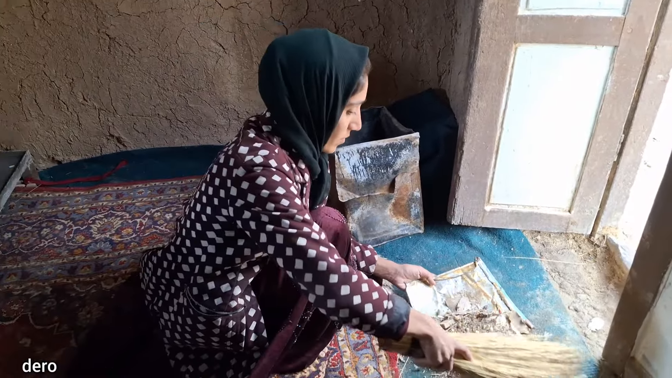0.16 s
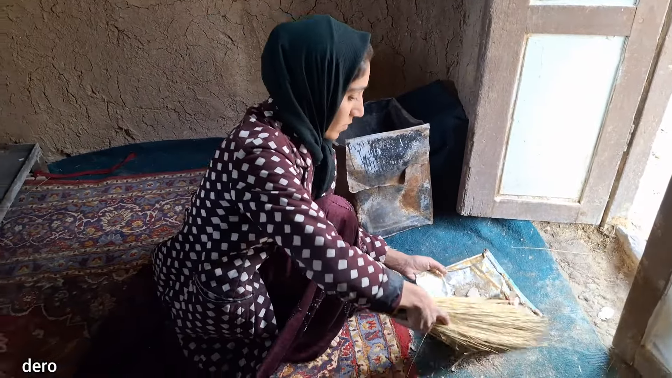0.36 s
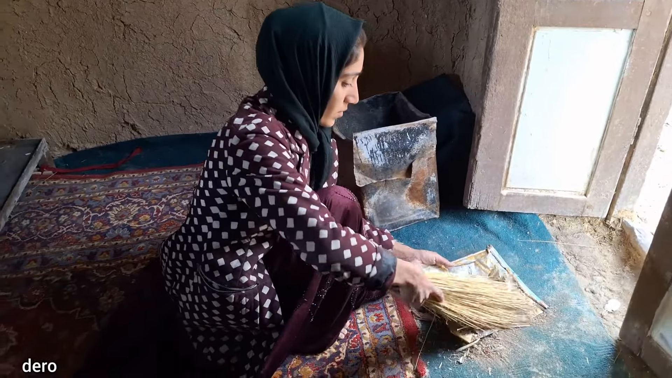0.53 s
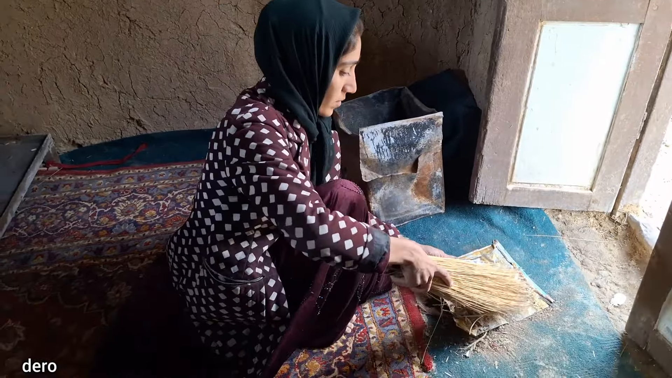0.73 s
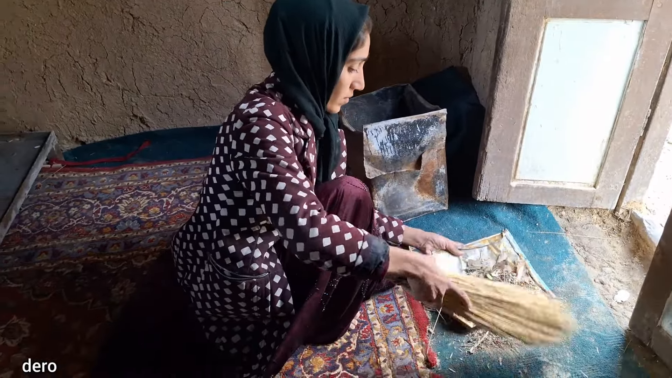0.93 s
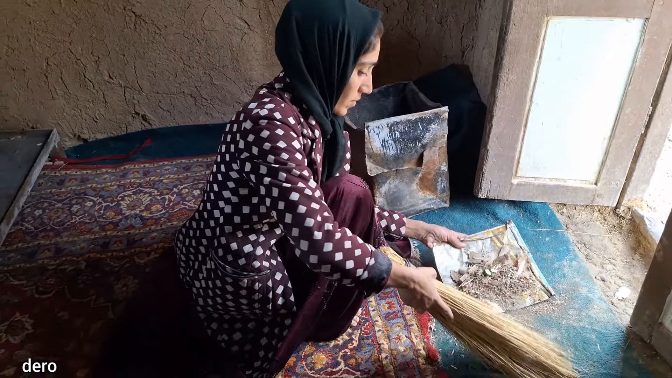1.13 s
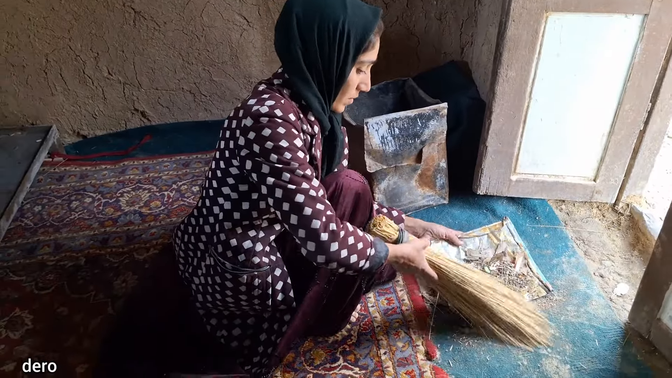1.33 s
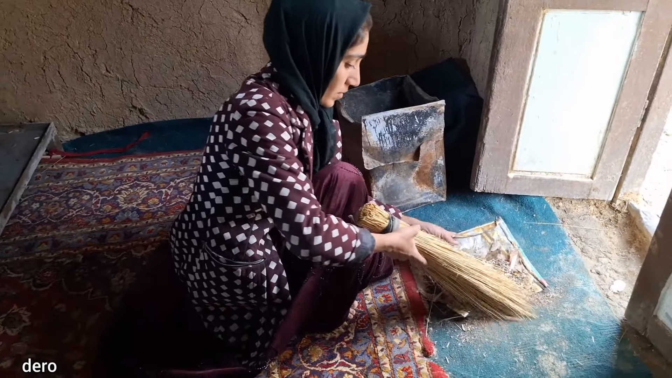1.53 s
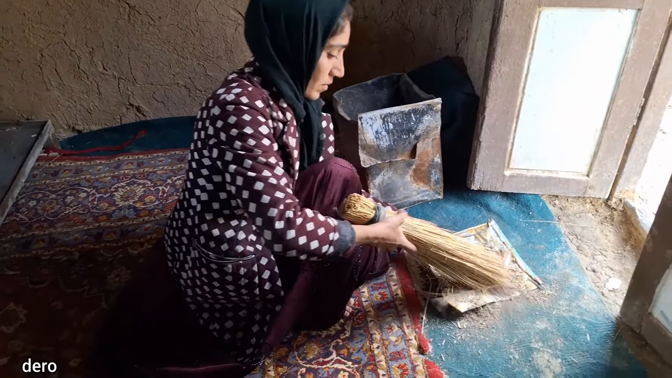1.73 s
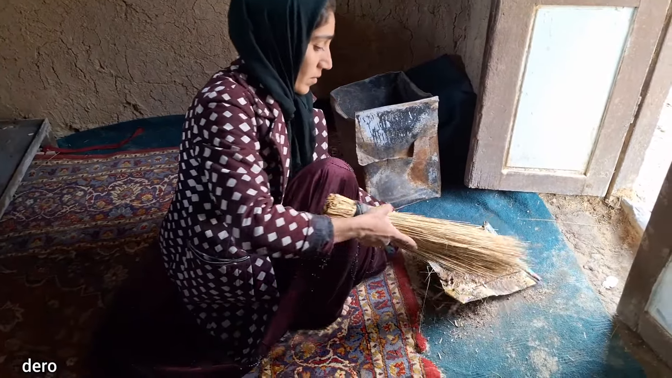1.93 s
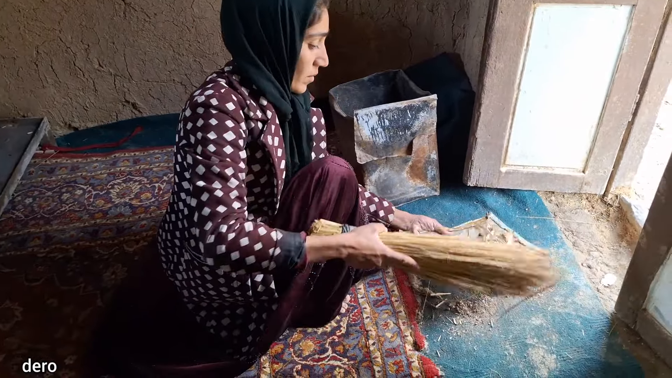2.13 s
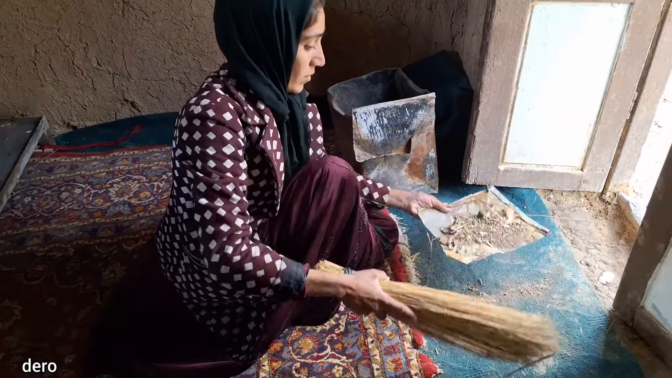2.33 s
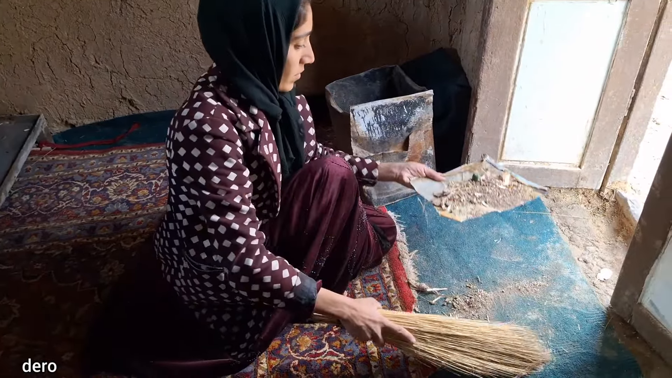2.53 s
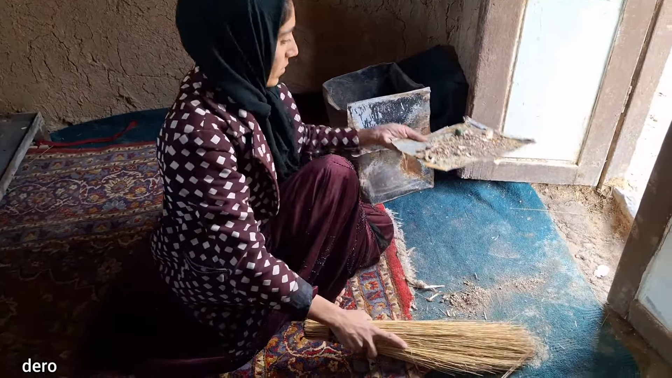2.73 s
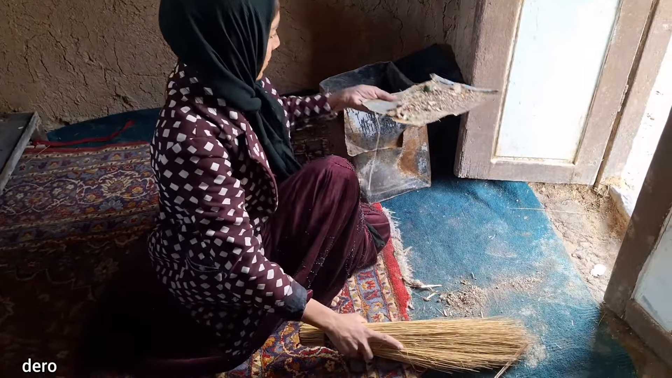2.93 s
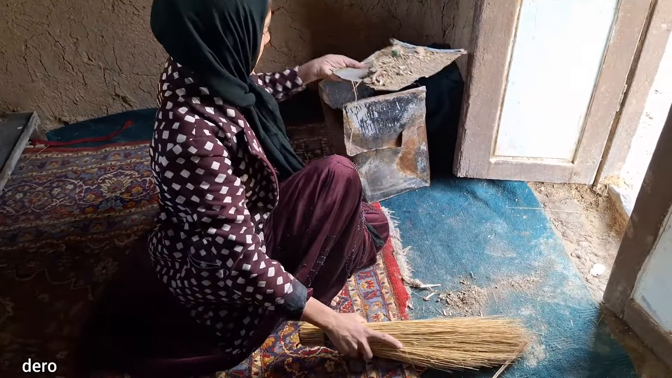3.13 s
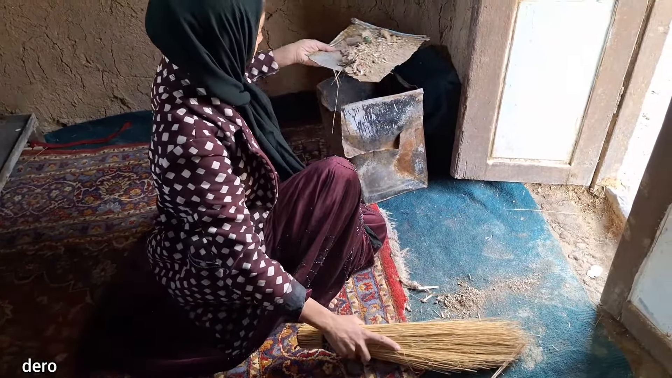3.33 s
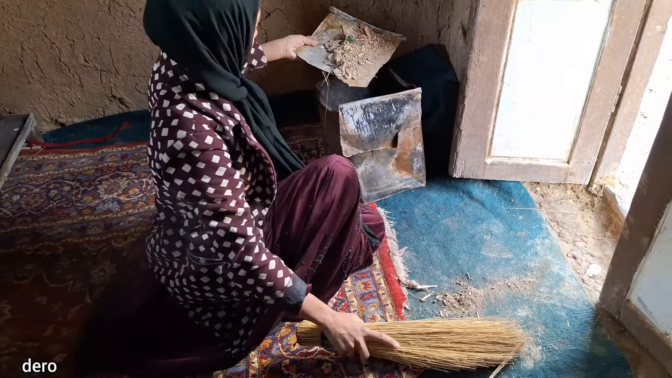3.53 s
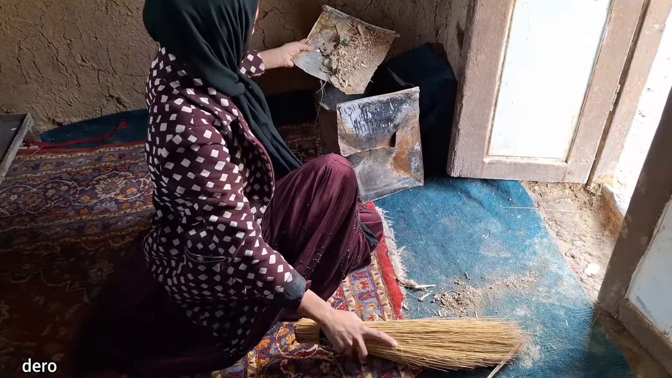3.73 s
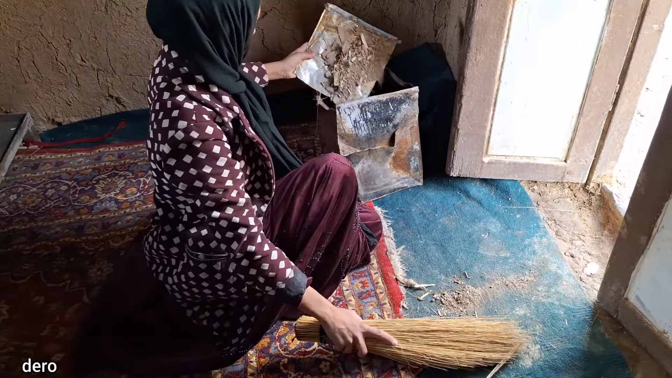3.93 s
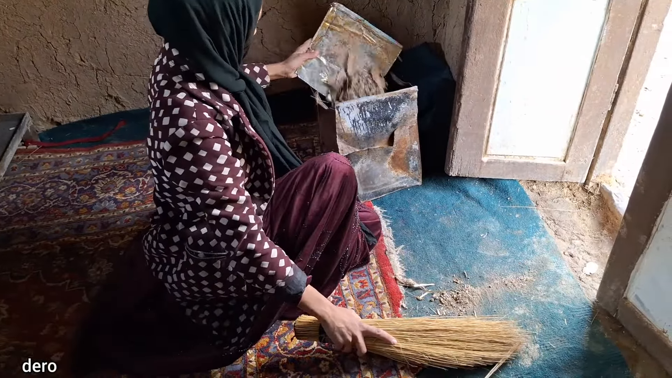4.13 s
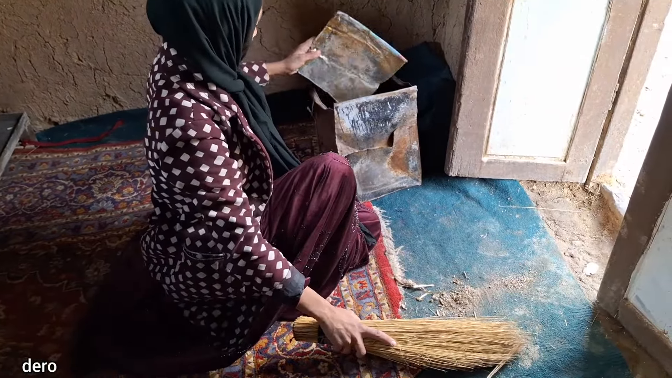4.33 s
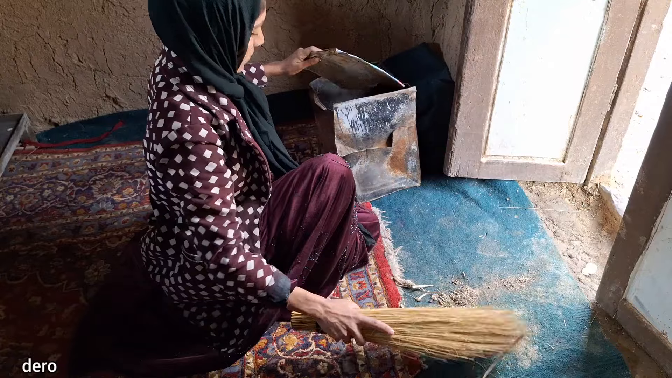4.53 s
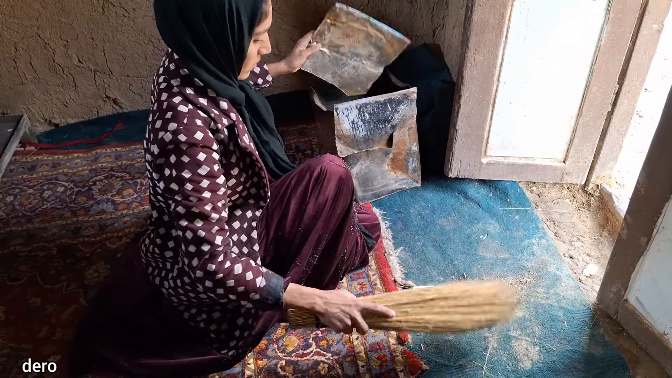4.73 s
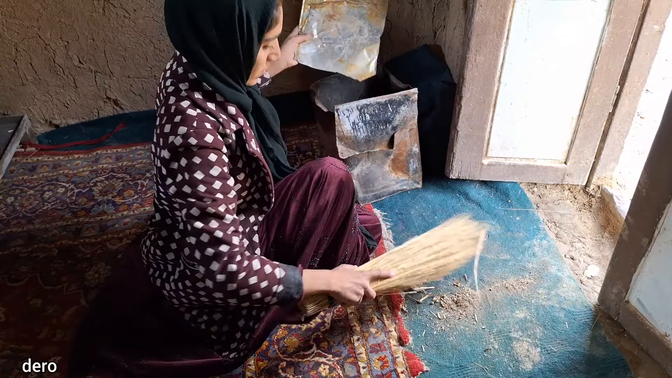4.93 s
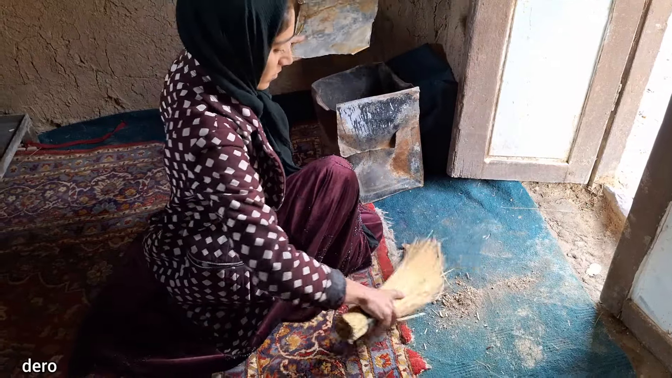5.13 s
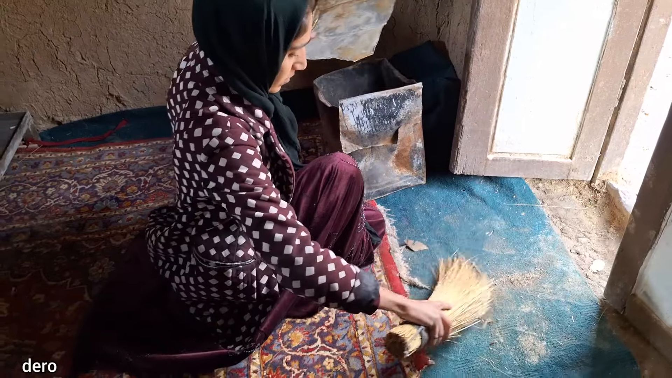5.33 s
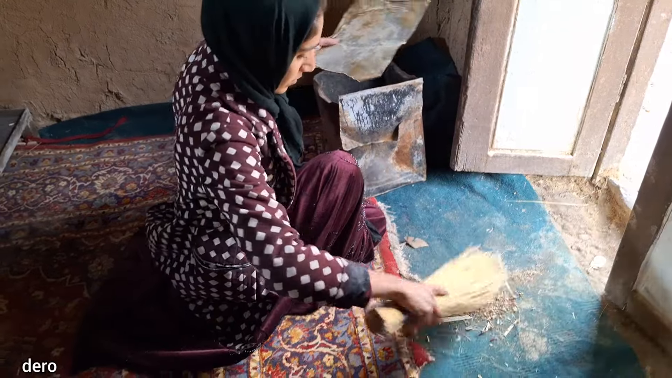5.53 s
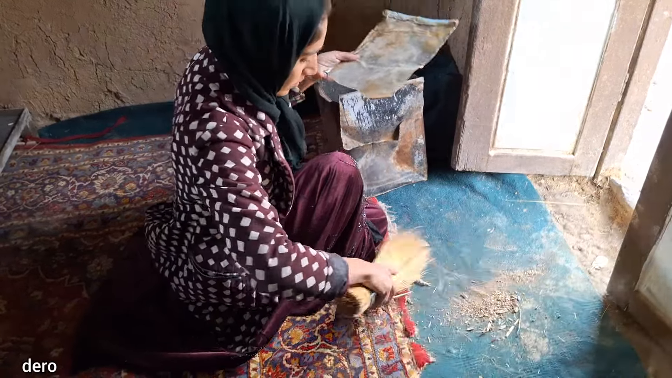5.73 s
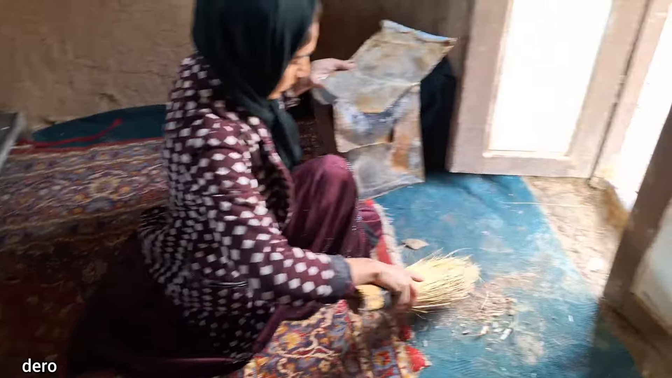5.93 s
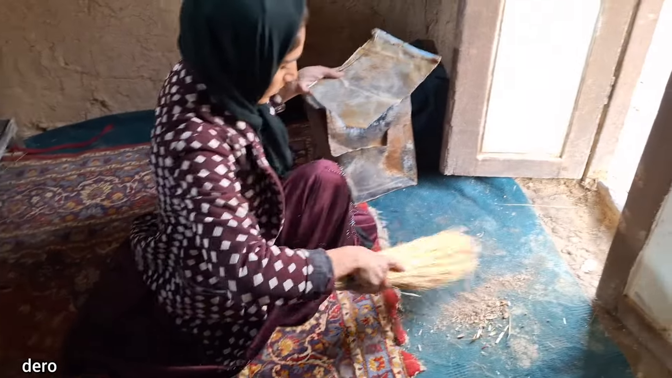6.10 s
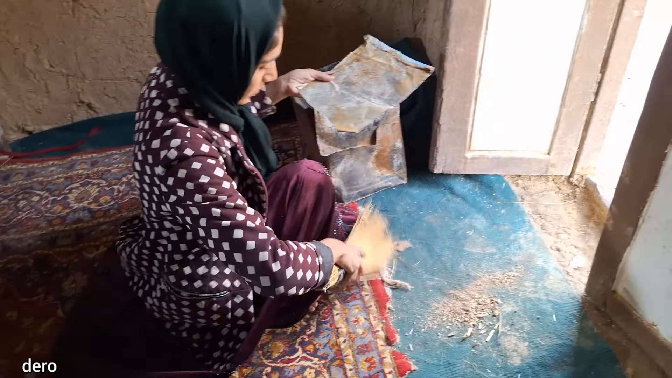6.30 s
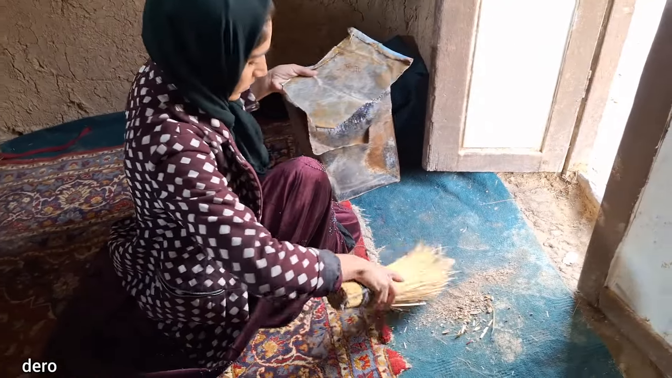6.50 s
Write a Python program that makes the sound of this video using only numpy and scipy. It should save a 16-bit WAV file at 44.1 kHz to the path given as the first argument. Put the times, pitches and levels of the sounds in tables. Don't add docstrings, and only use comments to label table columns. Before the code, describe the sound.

Close in a small room, a short straw broom makes quick dry rasps on a rug, pushing grit that rattles and ticks on a thin metal pan. A quiet gap follows, then dirt slides off and a lump bangs a tin bin, its walls ringing briefly. Three light brush strokes end it, over faint distant rumble and microphone hiss, the broom slightly to the right.

```python
import sys
import numpy as np
from scipy import signal
from scipy.fft import rfft, irfft, next_fast_len
from scipy.io import wavfile

SR = 44100
rng = np.random.default_rng(int(sys.argv[2]) if len(sys.argv) > 2 else 0)


def pcm_store(signal):
    levels = np.round(np.clip(np.atleast_2d(signal), -1, 1) * 32767)
    wavfile.write(sys.argv[1], SR, levels.astype(np.int16).T)


def convert_level_to_amplitude(level_db):
    exponent = np.asarray(level_db, float) / 20
    return 10 ** exponent


N = 293706
SIZE = next_fast_len(N + SR)

# pitch in Hz, level in dB, time to die by 60 dB in s.
PAN_MODES = [(713, -2, 0.1), (758.6, -0.5, 0.087), (797, -13.5, 0.017), (1160, -12.5, 0.2), (1277, -6, .04),
             (2030, -2.5, 0.03), (2940, -1.5, .02), (3963, 1.5, 0.027)]
# frequency in Hz, level in dB per Hz.
GRIT_TOP = [(4590, -26.5), (7800, -0.5), (8730, -14.5), (9840, 1), (11300, -6), (14500, -3.5), (15600, -6)]


def rms_one(x):
    return x / np.sqrt(np.mean(x ** 2) + 1e-20)


def at_bins(points):
    hz, value = np.transpose(points)
    return np.interp(np.log(np.fft.rfftfreq(SIZE, 1 / SR) + 1), np.log(hz), value)


def colour(x, spectrum):
    shaped = rfft(x, SIZE) * convert_level_to_amplitude(at_bins(spectrum))
    return rms_one(irfft(shaped, SIZE)[..., :N])


def above(x, hz):
    return signal.sosfilt(signal.butter(3, hz, "high", fs=SR, output="sos"), x)


def drift(rate):
    r = np.exp(-80 * np.pi * rate / SR)
    slow = signal.lfilter([1], [1, -2 * r, r * r], rng.standard_normal(N // 40 + 2002))[2000:]
    return np.interp(np.arange(N) / 40, np.arange(len(slow)), rms_one(slow))


def ring(clicks, hz, t60):
    r, w = convert_level_to_amplitude(-60 / (t60 * SR)), 2 * np.pi * hz / SR
    return signal.lfilter([0, np.sin(w)], [1, -2 * r * np.cos(w), r * r], clicks + 1e-18)


def grains(per_s, spread_db, clump_db, jolt_db):
    sizes = convert_level_to_amplitude(spread_db * np.minimum(rng.exponential(1, (2, N)), 3.6))
    sizes = sizes * rng.choice([-1, 1], (2, N))
    born = rng.random((2, N)) < per_s / SR
    starts = (rng.random(N) < 25.0 / SR) * rng.random(N)
    jolts = signal.lfilter([1], [1, -np.exp(-70.0 / SR)], starts)
    return rms_one(sizes * born * convert_level_to_amplitude(clump_db * drift(30) + jolt_db * np.minimum(jolts, 1.5)))


def swells(peak_s, peak_db, rise_s, fall_s, shape):
    t = np.arange(0, N + 32, 32)[:, None] / SR - peak_s
    away = np.where(t < 0, -t / np.maximum(rise_s, .003), t / np.maximum(fall_s, .003))
    level_db = np.maximum(peak_db - 20 * away ** shape, -140)
    gain = np.sqrt(np.sum(convert_level_to_amplitude(2 * level_db), axis=1))
    return np.interp(np.arange(N) / 32, np.arange(len(gain)), gain)


def in_time(points):
    first, last = points[0], points[-1]
    rows = [(first[0] - .03, -110, *first[2:]), *points, (last[0] + .03, -110, *last[2:])]
    s, *columns = np.transpose(rows)
    return [np.interp(np.arange(N) / SR, s, c) for c in columns]


def rug_strokes(slips):
    # frequency in Hz, level in dB per Hz.
    stalk_colour = [(240, -44), (400, -12.5), (520, -21), (613, -14.5), (677, -16), (1130, -9), (1760, -7),
                    (2860, -2.5), (3090, -3.5), (5030, -7), (7150, -10), (8000, -21), (10400, -40.5),
                    (17600, -120)]
    # frequency in Hz, level in dB per Hz.
    tip_colour = [(4590, -32.5), (7800, -5), (8840, -6.5), (11400, -2.5), (12300, -3.5), (14400, 2.5),
                  (15600, -1.5)]
    # fastest moment in s, stalk scratch in dB, rise in s, fall in s, tips in dB over scratch.
    sweeps = [(.03, -58, .08, .07, 1.5), (.17, -56.5, 0.18, 0.14, -5), (.28, -51, 0.15, 0.17, -2),
              (.45, -51.5, 0.19, 0.25, -1.5), (.87, -72, 0.04, .08, 6), (1.21, -54.5, 0.075, 0.19, -3.5),
              (1.39, -48.5, 0.16, .15, -1.5), (1.64, -53.5, 0.23, .22, -2), (2.605, -60, 0.056, .035, 4.5),
              (2.68, -75.5, .1, 0.23, 1), (3.92, -64.5, .06, .15, -6), (4.101, -46, 0.15, 0.28, -6.5),
              (5.12, -71, .05, .1, 2.5), (5.211, -56, 0.11, 0.24, -1), (5.38, -56, 0.22, 0.16, -5.5),
              (5.83, -74, 0.064, .1, 3.5), (5.94, -51.5, 0.0954, 0.088, -4.5),
              (6.421, -56.5, 0.087, 0.23, 0.5), (6.56, -47, 0.22, .1, -4)]
    shape, split_hz = 2.1, 1500
    tips_lead, bass_lag = 0.28, 0.15

    s, db, rise, fall, tips_db = np.transpose(sweeps)
    stalks = colour(slips, stalk_colour)
    thin = above(stalks, split_hz)
    thick = signal.sosfilt(signal.butter(3, split_hz, fs=SR, output="sos"), stalks)
    thick_db = db - 4.5 - 1.16 * tips_db
    thin_gain = swells(s, db, rise, fall, shape)
    thick_gain = swells(s + bass_lag * fall, thick_db, 0.97 * rise, 0.67 * fall, shape)
    tips_gain = swells(s - tips_lead * rise, db + tips_db, 0.77 * rise, 1.7 * fall, shape)
    return thin_gain * thin + thick_gain * thick + tips_gain * colour(slips, tip_colour)


def pan_slides(slips, grit):
    # frequency in Hz, level in dB per Hz.
    grit_colour = [(880, -28), (1500, -6.5), (1580, -5.5), (2660, -0.5), (3000, 0), (3330, -3),
                   (3860, -1.5), (4930, -8.5), (7000, -11), (8000, -26), (10400, -47), (17600, -120)]
    # frequency in Hz, level in dB per Hz.
    body_colour = [(150, -45.5), (250, -14), (363, -8.5), (414, -25.5), (480, -8.5), (535, -15),
                   (726, -5.5), (914, -11), (1180, -5), (1420, -16.5), (1800, -13), (2340, -32.5),
                   (3960, -120)]
    # loudest moment in s, rattle in dB, rise in s, fall in s, drumming in dB over rattle.
    slides = [(.01, -63.5, 0.08, 0.075, 4.5), (.35, -40.5, 0.07, 0.13, -7.5), (.37, -38, .012, 0.092, -2),
              (.455, -35, 0.077, 0.22, -5.5), (.555, -43, 0.027, 0.16, -4), (.765, -67.5, .012, 0.082, 5),
              (.96, -61, .05, 0.49, 1), (1.07, -56.5, 0.16, 0.074, -2.5), (1.346, -42.5, .01, 0.032, -14),
              (1.385, -44, 0.025, 0.13, -9), (1.47, -50, 0.12, .15, -4), (1.53, -51, 0.15, 0.095, -2.5),
              (1.635, -43.5, 0.11, 0.096, -8.5), (1.7, -44.5, 0.14, 0.048, -7.5),
              (1.755, -50, 0.014, 0.066, -7), (1.815, -55, 0.036, 0.031, -13),
              (1.85, -61, 0.017, 0.186, -9.5), (1.96, -77.5, .1, 0.55, -11),
              (2.045, -65.5, .03, 0.051, -5.5), (2.435, -76, .02, .1, -7.5),
              (3.965, -55.5, .07, 0.36, -1.5), (4.076, -40.5, .09, .28, -2.5),
              (4.18, -43.5, .11, 0.19, -7.5), (4.285, -41, 0.09, .03, -28)]
    shape = 0.98

    s, db, rise, fall, drum_db = np.transpose(slides)
    sheet = colour(grit, grit_colour) + convert_level_to_amplitude(-12.5) * colour(grit + 1.3 * slips, GRIT_TOP)
    modes = sum(convert_level_to_amplitude(level + 4.0 * drift(8)) * ring(grit, hz, t60) for hz, level, t60 in PAN_MODES[:5])
    modes = rms_one(above(above(modes, 600), 600))
    drummed = swells(s, db + drum_db, rise, fall, shape) * (.6 * colour(grit, body_colour) + modes)
    drummed[1] *= .6
    return swells(s, db, rise, fall, shape) * sheet + drummed


def ticks():
    # start in seconds, peak in dB, ring in Hz, snap in dB over peak.
    strikes = [(0.32, -31, 2860, -2), (0.343, -22, 1210, -12), (0.439, -20, 1280, -12),
               (0.454, -30, 750, -5), (0.485, -23, 1260, -9), (0.554, -26, 1160, -2),
               (0.694, -36, 9050, 12), (0.722, -34.5, 2130, -8), (0.761, -38, 766, -7),
               (1.066, -37, 690, -10.5), (1.345, -26.5, 1180, -11), (1.377, -21, 4000, -3),
               (1.419, -33.5, 780, -5), (1.628, -22, 3150, -9), (1.679, -30, 2970, -3.5),
               (1.698, -25, 1330, -11), (1.75, -28.5, 1270, -8), (1.813, -30.5, 3000, -6),
               (1.845, -28.5, 5110, 2), (2.042, -38.5, 4200, 1.5), (2.128, -45.5, 9050, -0.5),
               (2.549, -52, 5980, 3), (2.58, -54, 3310, -4), (2.61, -37, 3760, -11),
               (2.688, -49.5, 10500, 1), (4.009, -41.5, 810, -8), (0.872, -45, 9150, 1),
               (4.074, -35, 740, -3), (4.126, -25, 1120, 4), (4.798, -50, 5500, -5)]
    out, length = np.zeros(N + SR), SR // 8
    t = np.arange(length) / SR
    for s, peak_db, hz, top_db in strikes:
        burst = rng.standard_normal(length)
        crunch = burst * convert_level_to_amplitude(-60 * t / .014)
        own = ring(crunch, hz, 9.0 / hz)
        uneven_db = rng.normal(0, 3, len(PAN_MODES))
        pan = sum(convert_level_to_amplitude(db + k) * ring(crunch, f, t60) for (f, db, t60), k in zip(PAN_MODES, uneven_db))
        snap = above(burst * convert_level_to_amplitude(-60 * t / 0.0055), 2500)
        on_pan = .5 / (1 + (hz / 2500) ** 4)
        hit = above(own, hz / 2) / np.abs(own).max()
        hit = hit + on_pan * pan / np.abs(pan).max()
        hit = hit + convert_level_to_amplitude(top_db) * snap / np.abs(snap).max()
        start = round(s * SR)
        out[start:start + length] += convert_level_to_amplitude(peak_db - 5.0) * hit
    return out[:N]


def bin_bang():
    # (pitch in Hz, level in dB, 60 dB decay in s).
    blows = [
        ((4.287, 0.0024), [(1030, -30, 0.11), (803, -28.5, 0.12), (524, -34, 0.12)]),
        ((4.2945, 0.009), [(228.9, -12.5, 0.28), (281.4, -2, 0.15), (345.2, -10, 0.17), (369, -14.5, 0.16), (407, -19, 0.29), (474, -23, 0.2), (627.7, -38, 0.4), (700, -29, 0.32), (990, -18.5, 0.06), (1260, -20, 0.07), (1940, -18, .05)]),
        ((4.326, 0.0089), [(800, -19.5, 0.2), (886, -29.5, 0.084), (953.4, -16.5, 0.25), (1011, -30.5, 0.41), (1074, -35, .2), (1414, -35, .2), (1550, -37, 0.35), (1797, -33, 0.23), (2010, -29, 0.17), (2380, -21, 0.13), (2360, -33.5, 0.2), (2700, -34.5, .12), (4000, -35.5, 0.053)]),
    ]
    # time in seconds, level in dB, top end in dB over level.
    clatter = [
        (4.272, -52, -7.5),
        (4.302, -22, -15.5),
        (4.344, -23, -13.5),
        (4.506, -54.5, -20),
        (4.64, -81.5, -1.5),
        (4.78, -90, 7),
    ]
    # frequency in Hz, level in dB per Hz.
    clatter_colour = [(150, -30), (250, -9), (349, -11.5), (580, -18), (845, -15.5), (935, -8.5),
                      (1020, -16), (1230, -18.5), (2400, -19.5), (2580, -19.5), (8000, -33.5),
                      (10400, -67.5), (17600, -120)]

    clang = np.zeros(N)
    clatter_db, top_db = in_time(clatter)
    grit = grains(5000, 1.9, 1.6, 3.0)
    for (s, rise_s), modes in blows:
        start = round(s * SR)
        kicks = convert_level_to_amplitude(clatter_db[start:start + SR] - 27) * grit[0, start:start + SR]
        kicks[0] = 1
        swell = 1 - np.exp(-np.arange(SR) / SR / rise_s)
        clang[start:start + SR] += swell * sum(convert_level_to_amplitude(db) * ring(kicks, hz, t60) for hz, db, t60 in modes)
    rattle = convert_level_to_amplitude(clatter_db + 1.0) * colour(grit, clatter_colour)
    rattle = rattle + convert_level_to_amplitude(clatter_db + top_db) * colour(grit, GRIT_TOP)
    return above(above(clang, 190.1), 190.1), above(rattle, 220)


def thuds():
    # start in seconds, level in dB, pitch in Hz, 60 dB decay in s.
    bumps = [
        (2.283, -41.5, 94.5, 0.056),
        (2.70, -44, 110, .09),
        (3.702, -50, 151, 0.079),
        (4.056, -34, 215, 0.15),
        (4.076, -41.5, 189.4, 0.19),
        (4.133, -41, 210, 0.19),
        (4.223, -42.5, 290, 0.25),
        (5.878, -57, 171, 0.13),
    ]
    # pitch in Hz, level in dB, 60 dB decay in s.
    after_ring = [
        (290, -40, 1.1),
        (862, -40, .65),
        (1815, -43, .45),
    ]
    out = np.zeros(N)
    for s, db, hz, t60 in [*bumps, *[(4.31, db, hz, t60) for hz, db, t60 in after_ring]]:
        start = round(s * SR)
        click = np.zeros(min(SR, N - start))
        click[0] = convert_level_to_amplitude(db)
        soft_start = np.minimum(np.arange(len(click)) / SR / 0.0027, 1)
        out[start:start + SR] += ring(click, hz, t60) * soft_start
    return out


def pair(mid, side):
    # frequency in Hz, left-right likeness from 0 to 1.
    likeness = [(60, .88), (130, .85), (290, .75), (640, 0.54), (1400, 0.17), (3100, 0.064), (7000, 0.044),
                (15000, .01)]
    alike = np.clip(at_bins(likeness), 0, 1)
    m = rfft(mid, SIZE) * np.sqrt((1 + alike) / 2)
    s = rfft(side, SIZE) * np.sqrt((1 - alike) / 2)
    return np.array([irfft(m + s, SIZE)[:N], irfft(m - s, SIZE)[:N]])


def smear(x, t60):
    t = np.arange(SR // 2) / SR
    burst = rng.standard_normal(len(t)) * convert_level_to_amplitude(-60 * t / t60)
    return signal.fftconvolve(x, burst / np.sqrt(np.sum(burst ** 2)))[:N]


def room(mid, side, wet_db):
    t60_s = 0.36
    return pair(mid + convert_level_to_amplitude(wet_db) * smear(mid, t60_s), side + convert_level_to_amplitude(wet_db) * smear(side, t60_s))


def background():
    # time in seconds, rumble level in dB.
    rumble_level = [(0.0, -46), (0.02, -55.5), (0.7, -51.5), (0.74, -57.5), (1.67, -53.5), (2.54, -57.5),
                    (3.39, -53), (3.45, -58), (4.38, -49), (4.58, -53), (5.21, -60.5), (5.25, -52),
                    (5.45, -60.5), (6.66, -54.5)]
    # frequency in Hz, level in dB per Hz.
    rumble_colour = [(30, -25.5), (42, -7), (55, 4), (72, -14), (95, -4), (125, -19), (170, -23.5),
                     (230, -22), (320, -30.5), (500, -37.5), (700, -44), (1000, -54), (1400, -81.5)]
    # frequency in Hz, level in dB per Hz.
    hiss_colour = [(470, -40), (800, -12.5), (988, -15.5), (1250, -16), (2950, -13.5), (3380, -10.5),
                   (3780, -15), (4730, -9), (7310, -0.5), (8170, -8), (8700, -11), (12300, -8), (15600, -8)]
    s, db = np.transpose(rumble_level)
    level = convert_level_to_amplitude(np.interp(np.arange(N) / SR, s, db) + 1.5 * drift(6))
    rumble = colour(pair(*rng.standard_normal((2, N))), rumble_colour)
    return level * rumble + convert_level_to_amplitude(-66.5) * colour(rng.standard_normal((2, N)), hiss_colour)


def scene():
    room_db = -9.5
    slips, grit = grains(10000, 1.9, 0.94, 2.5), grains(2500, 3.2, 2.4, 5.0)
    strokes = rug_strokes(slips) + pan_slides(slips, grit)
    struck = above(ticks(), 730)
    near = room(strokes[0] + struck, strokes[1] + 0.49 * smear(struck, .008), room_db)
    near = near * convert_level_to_amplitude(np.array([[-1.9], [1.9]]))
    clang, rattle = bin_bang()
    bang = room(clang + rattle[0], 0.45 * smear(clang, .05) + rattle[1], room_db - 3.0)
    bang = bang * convert_level_to_amplitude(np.array([[-.8], [.8]]))
    bumps = thuds()
    return convert_level_to_amplitude(0.5) * near + bang + pair(bumps, .5 * smear(bumps, .04)) + background()


def band_limit(x):
    return signal.sosfilt(signal.butter(12, 15830, fs=SR, output="sos"), x)


def record(dry):
    mic_low_hz, cutoff_hz = 42.6, 15830
    spectrum = rfft(above(above(dry, mic_low_hz), mic_low_hz), SIZE)
    spectrum[:, round(cutoff_hz * SIZE / SR):] = 0
    return band_limit(irfft(spectrum, SIZE)[:, :N])


dry = scene()
out = record(dry)
pcm_store(out)
```